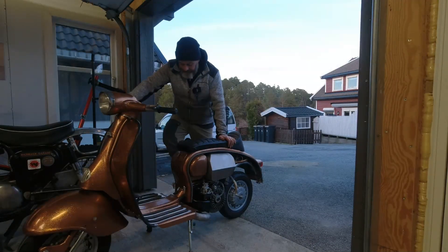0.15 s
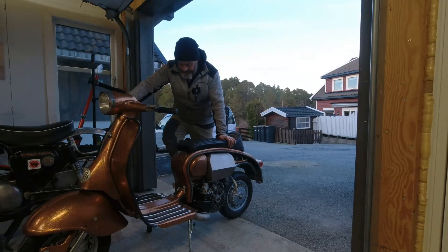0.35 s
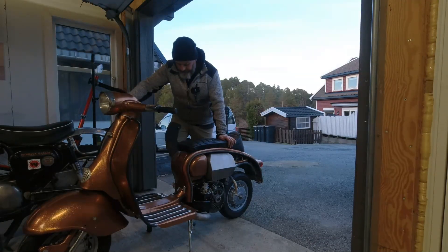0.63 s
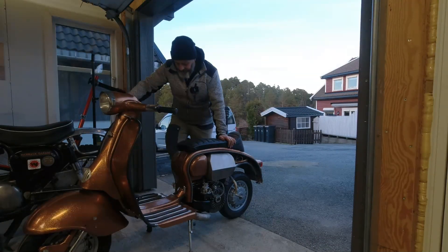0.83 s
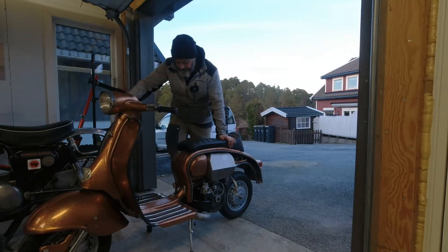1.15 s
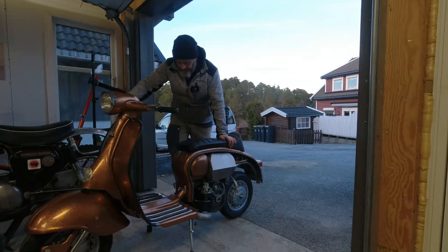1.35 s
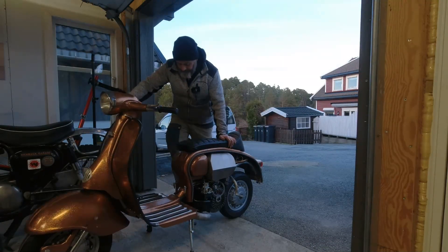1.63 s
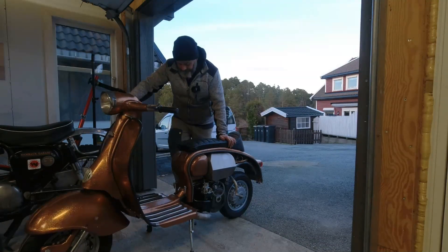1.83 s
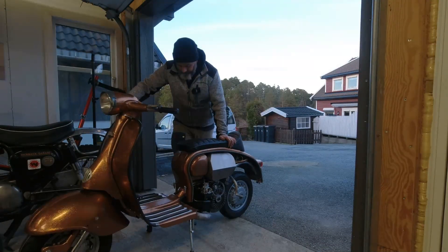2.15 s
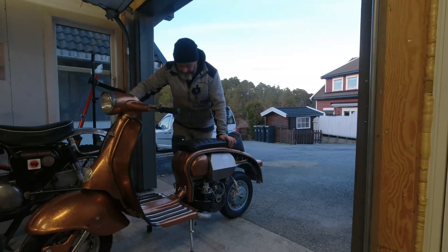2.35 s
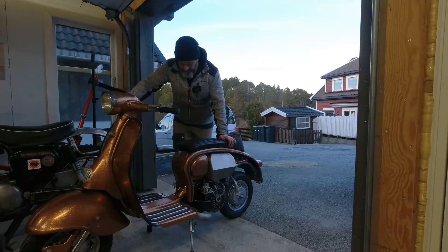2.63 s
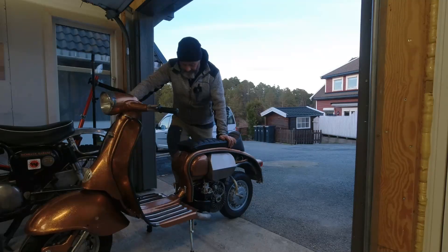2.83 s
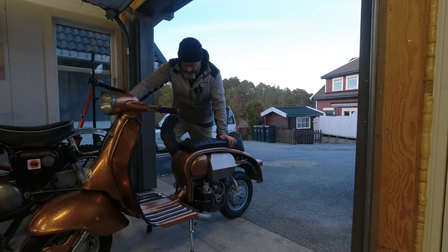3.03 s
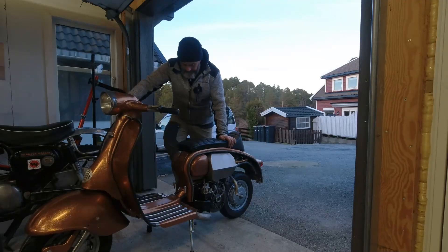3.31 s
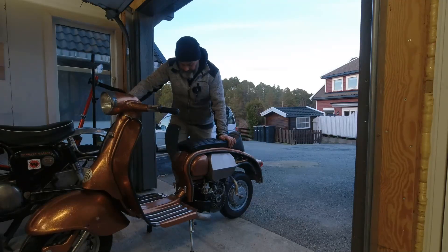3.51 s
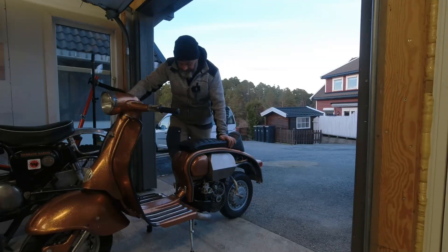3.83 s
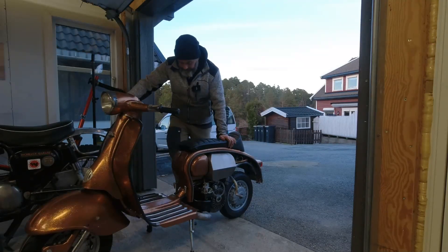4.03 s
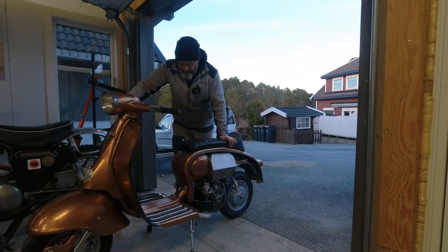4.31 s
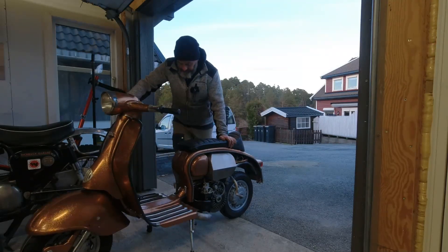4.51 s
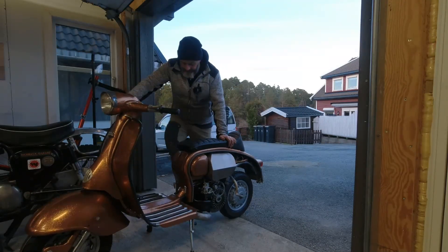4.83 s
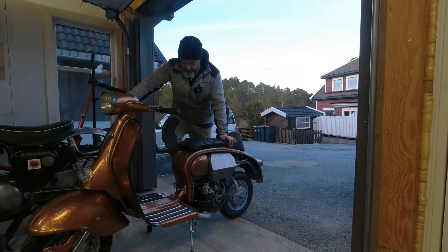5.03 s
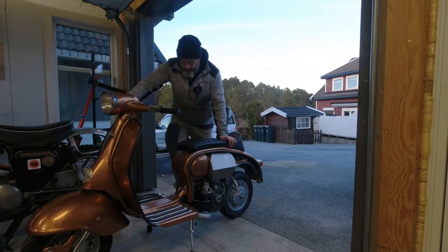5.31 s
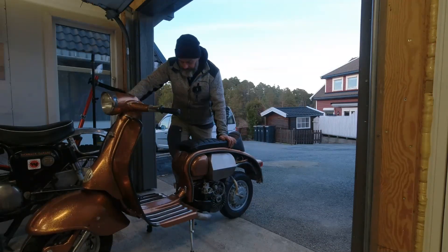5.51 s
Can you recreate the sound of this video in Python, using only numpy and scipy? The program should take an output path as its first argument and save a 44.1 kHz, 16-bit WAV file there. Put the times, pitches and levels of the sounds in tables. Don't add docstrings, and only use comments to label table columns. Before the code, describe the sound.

A scooter on its stand creaks with short, dry high squeaks in a garage doorway. Around two seconds a kick gives a thumping, rattling scrape; a second later the lever clanks back twice, ringing. Boots thud, squeaks return, then a second kick and another double clank. The engine never fires. Close stereo microphone, sparse garage echo, faint outdoor hush.

```python
import sys
import numpy as np
from scipy import signal
from scipy.fft import rfft, irfft
from scipy.io import wavfile
from scipy.ndimage import uniform_filter1d

SR = 44100
rng = np.random.default_rng(int(sys.argv[2]) if len(sys.argv) > 2 else 0)


def to_wav(sig):
    pcm = np.clip(np.atleast_2d(sig), -1, 1) * 32767
    pcm = np.round(pcm).astype(np.int16)
    wavfile.write(sys.argv[1], SR, pcm.T)


def convert_level_to_amplitude(level_db):
    exponent = np.asarray(level_db, float) / 20
    return 10 ** exponent


N = 249606


def evened(x):
    return x / np.sqrt(np.mean(x ** 2) + 1e-20)


def read(points, hz):
    f, value = np.transpose(points)
    return np.interp(np.log(hz + 1), np.log(f + 1), value)


def add(mix, s, sound):
    part = mix[round(s * SR):][:len(sound)]
    part += sound[:len(part)]


def wander(count, size, per_s):
    knots = rng.standard_normal((count, round(size / SR * per_s) + 3))
    at = np.arange(size) / SR * per_s
    return np.array([np.interp(at, np.arange(len(k)), k) for k in knots]) * np.sqrt(1.5)


def resonate(x, hz, width_hz):
    turn = np.exp(2j * np.pi * np.cumsum(hz * np.ones(len(x))) / SR)
    r = np.exp(-np.pi * width_hz / SR)
    return 2 * (turn * signal.lfilter([1 - r], [1, -r], x / turn)).real


def body(x, modes, patchy_db):
    total = np.zeros(N)
    for (hz, width_hz, db), drift in zip(modes, wander(len(modes), N, 14)):
        rung = resonate(resonate(x, hz, width_hz), hz, width_hz)
        total += convert_level_to_amplitude(db + patchy_db * drift) / np.sqrt(width_hz) * rung
    return evened(total)


def slips(per_s, spread_db):
    size = convert_level_to_amplitude(spread_db * np.minimum(rng.exponential(1, N), 4))
    return size * rng.choice([-1., 1.], N) * (rng.random(N) < per_s / SR)


def stroke(s, rise_s, hold_s, db, sag_db_per_s, release_db_per_s):
    rise_db, step = 25.5, 32
    t = np.arange(0, N, step) / SR - s
    after = np.maximum(t, 0)
    shape_db = rise_db * np.minimum(t, 0) / max(rise_s, .001)
    shape_db -= sag_db_per_s * np.minimum(after, hold_s)
    shape_db -= release_db_per_s * np.maximum(after - hold_s, 0)
    return np.repeat(convert_level_to_amplitude(np.maximum(db + shape_db, -140)), step)[:N]


def played(rows, sag_db_per_s, release_db_per_s, main, side):
    powers = np.array([stroke(*row[:4], sag_db_per_s, release_db_per_s) ** 2 for row in rows])
    side_powers = convert_level_to_amplitude([row[4] for row in rows]) ** 2 @ powers
    return main * np.sqrt(powers.sum(0)) + side * np.sqrt(side_powers)


def banded(x, band_hz, rise_s, order=4):
    t = np.arange(len(x)) / SR
    sos = signal.butter(order, band_hz, "bandpass", fs=SR, output="sos")
    x = signal.sosfilt(sos, x * (1 - np.exp(-(t / rise_s) ** 2)))
    return x / np.std(x[:round(0.011 * SR)])


def air():
    # frequency in Hz, level in dB per Hz.
    hush = [(20, -17.5), (113, -2), (298, 0.5), (1270, -13.5), (1800, -20), (5500, -25.5), (11900, -33),
            (15600, -56.5)]
    hz = np.fft.rfftfreq(1024, 1 / SR)
    a, b, patches = rng.standard_normal((N // 256 + 5, 513, 3)).T
    patches = evened(uniform_filter1d(uniform_filter1d(patches, 14, 0), 16, 1))
    z = (a + 1j * b) * convert_level_to_amplitude(read(hush, hz)[:, None] + 3.15 * patches)
    return convert_level_to_amplitude(-66) * evened(signal.istft(z, nperseg=1024, noverlap=768)[1][:N])


def garage(x):
    # frequency in Hz, t60 in seconds.
    dying = [(150, 0.48), (500, 0.45), (1500, 0.61), (4000, 0.34), (10000, 0.34)]
    taps = np.zeros(SR)
    at = np.arange(300, SR - 20, 20)
    taps[at + rng.integers(0, 20, len(at))] = rng.choice([-1., 1.], len(at))
    hz, t, z = signal.stft(taps, SR, nperseg=256)
    tail = signal.istft(z * convert_level_to_amplitude(-60 * t / read(dying, hz)[:, None]), SR, nperseg=256)[1]
    return signal.fftconvolve(x, tail / np.linalg.norm(tail))[:N]


def spread(x):
    # frequency in Hz, left-right likeness [0-1].
    likeness = [(60, 1.0001), (150, .9985), (300, .998), (700, .993), (1300, .982), (2000, .89),
                (4970, 0.93), (9000, .84), (15000, 0.35)]
    # frequency in Hz, gain [ratio].
    left_gain = [(300, 1), (1500, .975), (12000, .955)]
    hz, t, z = signal.stft(x, SR, nperseg=512)
    apart = np.sqrt(np.clip(1.0003 - read(likeness, hz), 0, 1) / 2)[:, None]
    apart = apart * np.exp(2j * np.pi * rng.random(z.shape))
    ports = np.array([z * (read(left_gain, hz)[:, None] + apart), z * (1 - apart)])
    return signal.istft(ports, SR, nperseg=512)[1][:, :N]


def scuffs():
    # full at in seconds, rise in seconds, hold in seconds, level in dB, lower grit in dB relative.
    brushes = [(0.084, 0.044, 0.076, -65, -2), (0.256, 0.08, 0.0067, -72, 2),
               (1.372, 0.055, 0.0088, -57.5, -2.5), (2.1, 0.022, 0.033, -71, 2),
               (2.975, 0.088, 0.023, -50.5, -1.5), (4.89, 0.1, 0.018, -65, -2.5),
               (4.99, 0.016, 0.013, -50, -3.5), (2.1, .02, .006, -64, 8), (3.2, 0.013, .006, -61, 7.5),
               (2.334, .01, .004, -63, -1), (0.542, .03, 0.025, -69.5, 3.5), (.005, .005, 0.037, -73, 4.5)]
    # frequency in Hz, width in Hz, level in dB.
    grit_high = [(7000, 3500, 0), (10500, 3500, -5)]
    grit_low = [(2500, 1800, 0), (3900, 2000, -1)]
    drive = slips(2500, 1.9)
    return played(brushes, 53, 396.5, body(drive, grit_high, 2.5), body(drive, grit_low, 2.5))


def squeals():
    # start in seconds, length in seconds, start in Hz, end in Hz, level in dB.
    whistles = [(.74, .18, 2120, 2140, -64), (.73, .06, 2670, 2640, -61), (.955, .075, 3280, 3284, -67),
                (2.342, .026, 10500, 10600, -70), (2.39, .19, 8300, 8530, -74),
                (2.742, .07, 2190, 2220, -69), (3.817, .072, 2610, 3750, -67),
                (4.033, .056, 2520, 3300, -75), (3.15, .17, 13050, 12900, -69),
                (5.01, .11, 12900, 13000, -66), (1.34, .045, 3600, 3600, -70),
                (2.955, .045, 6200, 6150, -54), (.95, .09, 2100, 2100, -69), (2.95, .04, 2650, 2650, -58),
                (.71, .06, 6950, 6900, -57), (3.6, .07, 2150, 2150, -66), (2.025, .02, 8600, 8600, -48)]
    out = np.zeros(N)
    for s, length_s, start_hz, end_hz, db in whistles:
        hz = np.linspace(start_hz, end_hz, round(length_s * SR))
        tone = resonate(resonate(rng.standard_normal(len(hz)), hz, 110), hz, 110)
        add(out, s, convert_level_to_amplitude(db) * evened(tone) * np.hanning(len(hz)))
    return out


def rub():
    # full at in seconds, rise in seconds, hold in seconds, level in dB,
    # lower squeaks in dB relative.
    rubs = [(.08, 0.015, 0.032, -44.5, -13.5), (.264, 0.03, 0.0035, -68, 1.5),
            (.7, 0.015, 0.12, -42, -15.5), (.986, 0.072, 0.0059, -63, -4), (1.2, 0.016, 0.0077, -72.5, -3),
            (1.968, .015, .01, -62, -10), (2.36, 0.036, 0.16, -46.5, -14.5),
            (2.772, 0.055, 0.015, -60, -4.5), (3.546, 0.018, 0.05, -52, -18),
            (3.598, 0.024, 0.079, -50.5, -9.5), (3.86, 0.17, 0.006, -58, -7.5),
            (4.06, 0.067, 0.01, -68, -4.5), (4.22, 0.039, 0.095, -65.5, -6),
            (4.66, 0.079, 0.012, -62, -2.5), (4.885, 0.046, 0.022, -62.5, 4.5),
            (5.566, 0.006, 0.047, -51, -12.5), (5.615, 0.062, .07, -47, -13)]
    scrapes = [
        (2.012, 0.019, 0.0037, -29, -6.5),
        (2.04, .01, 0.029, -45, 0),
        (2.097, 0.012, 0.041, -32.5, -5.5),
        (2.18, 0.0089, 0.017, -54, -12),
        (2.965, 0.021, 0.054, -45.5, -5),
        (4.337, 0.012, 0.023, -32.5, -11),
        (4.39, .01, 0.017, -46.5, -10),
        (4.428, 0.011, 0.051, -32, -9),
        (4.5, 0.011, 0.081, -49, -5.5),
    ]
    # time in seconds, frequency in Hz.
    joint = [(.1, 6430), (.3, 6430), (.8, 6230), (2.02, 6000), (2.12, 6080), (2.45, 6160), (3.6, 6140),
             (4.4, 6035), (5.6, 6190)]
    # frequency in Hz, width in Hz, level in dB.
    rub_low = [(2110, 310, 2), (2550, 390, -8), (3300, 75, -9), (2750, 1400, 9.5)]
    rub_high = [(8560, 340, 3.5), (9660, 300, 1.5), (10150, 260, 3.5), (11160, 344, 0), (11920, 460, -4),
                (10500, 2500, 1.5)]
    grind_modes = [(4900, 500, -3), (7480, 800, 5), (8140, 700, 0.5), (10280, 1300, 0.5), (8400, 4400, 5),
                   (12500, 2000, -13)]
    hz = np.interp(np.arange(N) / SR, *np.transpose(joint)) + 45 * wander(1, N, 18)[0]
    drive = slips(3000, 2.5)
    core = evened(resonate(resonate(drive, hz, 380), hz, 380))
    skirt = body(drive, [(1.087 * hz, 600, 0), (0.75 * hz, 300, -14)], 2.7)
    free = evened(core + .42 * skirt)
    low, high = body(drive, rub_low, 3), body(drive, rub_high, 3)
    loaded = body(drive, [(hz, 520, 0), (1.037 * hz, 900, -3)], 2.5)
    grind = body(slips(4000, 2.5), grind_modes, 4)
    rubbing = played(rubs, 35, 346, free + convert_level_to_amplitude(-20) * high, low)
    scraping = played(scrapes, 57, 598.5, loaded + convert_level_to_amplitude(-4.5) * grind, low)
    return rubbing + scraping


def frame():
    # full at in seconds, rise in seconds, hold in seconds, thump in dB, panel rattle in dB relative.
    jolts = [(.001, .001, .004, -57.5, 2.5), (.318, .06, .01, -90, -9), (.976, .04, 0.0082, -86, -49.5),
             (1.38, 0.12, .015, -50.5, -33), (1.51, .03, 0.038, -64.5, -8), (1.84, 0.12, 0.009, -62.5, -38),
             (2.005, 0.029, 0.04, -41, 3.5), (2.04, 0.021, 0.018, -34, -5), (2.1, 0.035, 0.055, -32, -6),
             (2.17, 0.022, 0.047, -38.5, -4), (2.28, .02, 0.13, -59, -6), (2.654, 0.038, .01, -77, -17),
             (2.826, 0.13, .01, -57, -12.5), (2.96, 0.1, 0.033, -58, -1.5), (3.2, .05, 0.046, -53, -20),
             (3.5, .02, 0.063, -67.5, 8), (4.352, 0.035, 0.036, -31.5, -2.5), (4.43, 0.031, .04, -32.5, -4),
             (4.47, .01, 0.057, -40.5, -2.5), (4.58, .02, 0.27, -60, -14), (4.834, 0.071, 0.046, -60, -12),
             (5.15, 0.099, 0.086, -55, -16.5), (5.4, .02, .07, -63, 8)]
    # full at in seconds, rise in seconds, hold in seconds, level in dB.
    puff_rows = [
        (2.043, 0.045, .01, -34),
        (2.22, 0.048, .01, -65),
        (4.376, .06, .03, -43),
        (4.486, .04, .01, -60),
        (4.822, .05, 0.0087, -68),
    ]
    # frequency in Hz, width in Hz, level in dB.
    frame_modes = [(112, 39, -8), (155.8, 47, -3), (169.6, 84, 4.5), (211.7, 34, 6), (275.4, 15, -3.5),
                   (202, 170, 3)]
    panel_modes = [(400, 34, 0.5), (460, 50, -1.5), (568, 175, 1), (655, 230, -11.5), (954, 290, 0.5),
                   (1268, 80, -5), (960, 5500, -9.5)]
    silencer_modes = [(63, 38, -12), (102.1, 25, -6)]
    thump = body(slips(400, 3.9), frame_modes, 2.8)
    rattle = body(slips(900, 2.13), panel_modes, 2.7)
    tremble = convert_level_to_amplitude(-75.5) * (thump + convert_level_to_amplitude(-0.5) * rattle)
    puff_gain = convert_level_to_amplitude(-76.5) + sum(stroke(*row, 0, 256.5) for row in puff_rows)
    puffs = puff_gain * body(slips(250, 8.16), silencer_modes, 0.89)
    return played(jolts, 45.5, 374, thump, rattle) + tremble + puffs


def thud(scuff_db, boom_db, panel_db, hz, decay_s):
    t = np.arange(round(.2 * SR)) / SR
    push, slap, scuff = rng.standard_normal((3, len(t))) * convert_level_to_amplitude(2.3 * wander(3, len(t), 160))
    fade = np.exp(-t / max(decay_s, .002))
    buzz = 0.28 * np.exp(-t / 0.035)
    tone = np.sin(2 * np.pi * hz * t) + 0.62 * evened(resonate(push, 0.85 * hz, 0.7 * hz))
    boom = convert_level_to_amplitude(boom_db - 7.0) * banded(tone * fade, (min(170, 0.62 * hz), 850), 0.0076)
    panel = convert_level_to_amplitude(panel_db - 8.5) * banded(slap * (fade + buzz), (650, 2150), 0.0021, order=7)
    grit = convert_level_to_amplitude(scuff_db - 26.5) * banded(scuff * fade, (2200, 6000), 0.0091)
    return boom + panel + grit


def padded_blows():
    # start in seconds, boom in dB, panel in dB, boom in Hz, die-away in seconds.
    soft = [(.7232, -33, -44, 460, 0.017), (.7865, -47, -77, 518, 0.013), (1.285, -49.5, -58, 288.2, 0.087),
            (1.305, -46, -68, 440, 0.0097), (1.3546, -43, -57, 280, 0.014), (1.368, -40, -57, 388, 0.0077),
            (1.385, -47, -64, 287, 0.0069), (2.6421, -51.5, -60, 228, 0.0089),
            (2.9203, -54, -47.5, 626, 0.024), (2.9437, -43.5, -70, 236, 0.013),
            (3.0012, -33, -37.5, 423, 0.0064), (3.0113, -27.5, -35.5, 551.6, 0.026),
            (3.3394, -40, -44.5, 493, 0.018), (3.4121, -33, -42, 519, 0.012),
            (3.419, -29.5, -44, 351, 0.0088), (3.4292, -24, -46, 293, 0.0047),
            (3.444, -36, -54, 422, 0.011), (3.476, -48, -53, 400, 0.012), (4.14, -60, -70.5, 272, 0.032),
            (4.871, -52.5, -57, 562, 0.11), (4.92, -28, -36, 581, 0.012), (5.2832, -40, -47, 507, 0.0072),
            (5.3664, -27.5, -33, 500, 0.0035), (5.3781, -27, -45, 300, 0.0054)]
    stamps = [(2.025, -30, -51, 136, 0.019), (4.358, -30.5, -59, 134, 0.029),
              (1.9821, -46.5, -50, 323, 0.021), (2.0068, -27, -36, 205.5, 0.014),
              (2.0405, -22.5, -43, 170, 0.011), (2.0873, -20, -30, 166, 0.006),
              (2.2092, -29.5, -46, 305, 0.0075), (4.3177, -44.5, -51, 210, 0.032),
              (4.347, -30.5, -37, 190, 0.016), (4.3695, -21.5, -47, 140, 0.011),
              (4.385, -34.5, -53, 490, 0.035), (4.41, -36, -52, 125, .02), (2.115, -32, -46, 400, .015),
              (2.13, -29, -48, 190, .015), (4.455, -30.5, -48.5, 160, 0.018), (4.317, -44, -63.5, 250, .01),
              (2.075, -30, -52.5, 525, 0.017), (4.438, -29, -47.5, 179.5, 0.017),
              (4.4248, -28, -31, 206, 0.0076)]
    out = np.zeros(N)
    for rows, scuff_db in (soft, 5.5), (stamps, 12.5):
        for s, boom_db, panel_db, hz, decay_s in rows:
            add(out, s - .003, thud(panel_db + scuff_db, boom_db, panel_db, hz, decay_s))
    return out


def pings():
    # start in seconds, frequency in Hz, peak in dB, t60 in seconds.
    rung_modes = [(3.095, 4830, -30.5, .19), (3.0944, 5981, -32, .13), (3.0945, 3500, -24.5, 0.061),
                  (3.0944, 455, -25, 0.1), (3.166, 5380, -31, 0.045), (3.166, 6810, -29.5, .06),
                  (3.165, 3300, -32, 0.049), (3.166, 5990, -40, 0.28), (5.005, 4305, -25.5, 0.063),
                  (5.005, 5385, -29.5, 0.14), (5.005, 6500, -28, .06), (5.005, 1287, -25, .045),
                  (5.006, 5975, -36.5, 0.19), (5.0684, 3460, -22, 0.065), (5.0684, 3420, -40, 0.27),
                  (5.069, 5975, -35, 0.16), (5.0684, 6790, -39.5, 0.31), (5.0684, 4310, -31, 0.085),
                  (5.0682, 7400, -33, .06), (5.0686, 467, -23.5, 0.1), (3.412, 3520, -52, .06),
                  (3.412, 5330, -51, 0.049), (4.424, 7420, -28, .04), (5.367, 2050, -48, 0.18),
                  (5.367, 1705, -49, 0.27), (5.367, 1302, -45, 0.22), (4.921, 2560, -45, 0.19),
                  (4.921, 2050, -47, .08), (3.001, 4900, -38, 0.056), (3.001, 7800, -40, .04),
                  (3.001, 1283, -31, 0.13)]
    out, t = np.zeros(N), np.arange(round(.4 * SR)) / SR
    shake = wander(2 * len(rung_modes), len(t), 90).reshape(len(rung_modes), 2, -1)
    for (s, hz, db, t60_s), (p, q) in zip(rung_modes, shake):
        tone = (1 + 0.58 * p) * np.sin(2 * np.pi * hz * t) + 0.49 * q * np.cos(2 * np.pi * hz * t)
        add(out, s, convert_level_to_amplitude(db - 60 * t / t60_s) * tone * (1 - np.exp(-t * hz / 3)))
    return out


def knock(edge_db, body_db, plate_db, contact_s, ring, top_hz):
    # frequency in Hz, level in dB, t60 in seconds.
    struck_modes = [(399, -7, 0.13), (463, -2, 0.12), (508.8, -5, 0.14), (551.3, -5, 0.17), (745, -15, 0.13),
                    (897, -11, 0.44), (1018, -7, 0.23), (1154, -15, 0.17), (1227, -12, 0.2), (1278, -7, .12),
                    (1560, -18, .1), (1980, -12.5, 0.099),
                    (2640, -13, .2), (3450, -2, .11), (4240, -7, .14), (4544, -10, .15), (4815, -9, .14),
             (5220, -13, .12), (5370, -8, .12), (5744, -11, .15), (5995, -7, .13), (6810, -10, .2),
             (7400, -12, .1), (7950, -14, .15), (9150, -20, .18), (9750, -18, .1)]
    # frequency in Hz, level in dB per Hz.
    contact_colour = [(59, -55.5), (100, -2), (447, -4), (1260, -5.5), (1900, -16), (5510, -19.5),
                      (12000, -31.5), (15500, -65)]
    t, parts = np.arange(round(.5 * SR)) / SR, struck_modes
    bins_hz = np.fft.rfftfreq(len(t), 1 / SR)
    chance = rng.standard_normal(len(parts))
    shake = wander(2 * len(parts), len(t), 70).reshape(len(parts), 2, -1)
    modes, peaks = np.zeros(len(t)), np.zeros(len(bins_hz))
    for (hz, db, t60_s), a, (p, q) in zip(parts, chance, shake):
        tone = (.9 + 0.93 * p) * np.sin(2 * np.pi * hz * t) + 0.85 * q * np.cos(2 * np.pi * hz * t)
        modes += convert_level_to_amplitude(db + 1.2 * a - 60 * t / t60_s) * tone
        peaks += convert_level_to_amplitude(1.2 * a + .7 * db + 4) / (1 + ((bins_hz - hz) / (.02 * hz)) ** 2)
    lumps = .5 + (.15 + 2 * ring) * peaks
    colour = convert_level_to_amplitude(read(contact_colour, bins_hz)) * lumps
    noise = irfft(rfft(rng.standard_normal(len(t))) * colour, len(t))
    chatter = 0.16 * np.exp(-t / 0.042) * convert_level_to_amplitude(2.4 * wander(1, len(t), 200)[0])
    noise *= np.exp(-t / max(contact_s, .001)) + chatter
    out = np.zeros(len(t))
    for db, band_hz, rise_s in ((body_db, (190, 730), .005), (plate_db, (680, 2700), .002),
                                (edge_db - 11.5, (2400, top_hz), .0005)):
        burst = (1 - ring) * banded(noise, band_hz, rise_s, order=5)
        out += convert_level_to_amplitude(db) * (burst + .75 * ring * banded(modes, band_hz, rise_s))
    return out


def metal_blows():
    # start in seconds, edge peak in dB, body in dB, plate in dB, contact in seconds.
    clanks = [
        (3.0941, -12.5, -29.5, -27.5, 0.016),
        (3.166, -11.5, -28.5, -26, 0.0027),
        (5.005, -12, -29.5, -26, 0.0058),
        (5.0683, -11.5, -31, -28, 0.0031),
    ]
    # start in seconds, edge peak in dB, body in dB relative, plate in dB relative,
    # contact in seconds.
    ticks = [
        (0.4979, -36.5, -6.5, -11.5, 0.0087),
        (1.779, -56.5, -17, -9, 0.0052),
        (2.0963, -23.5, -4.5, -13.5, 0.003),
        (2.6425, -57.5, -13, -7, 0.004),
        (4.4243, -23, -15.5, -21.5, 0.0036),
        (5.36, -52.5, -4, -2, 0.006),
        (5.604, -40.5, -23, -53, 0.0042),
    ]
    clacks = [(1.287, -66, 10, -4, .005), (1.303, -64, 8, 2, .004), (1.352, -62, 6, 2, .004),
              (1.37, -58, 4, 0, .005), (1.51, -68, 12, 2, .005), (1.98, -60, 12, 10, .006),
              (3.42, -48, 10, 10, .008), (3.001, -25.5, -7.5, -1.5, 0.0056), (3.412, -45.5, -1, 7, .012),
              (3.472, -62, -1, 6, 0.0025), (4.842, -64, 15, 8, 0.003), (4.869, -60, 12, 12, .004),
              (4.921, -46, 10, 12.5, 0.013), (4.927, -43.5, 2.5, 10, 0.0023), (5.279, -41.5, -7, 4, 0.0046),
              (2.918, -55.5, 3, 7, .006), (4.955, -58, 6, 8, .004), (3.335, -49, -3, 3, .008),
              (5.367, -47.5, 12, 12.5, 0.0073), (5.381, -50.5, 19, 1, 0.0058)]
    out = np.zeros(N)
    for s, *blow in clanks:
        add(out, s, knock(*blow, ring=.3, top_hz=11900))
    for rows, top_hz in (ticks, 11700), (clacks, 5900):
        for s, edge_db, body_db, plate_db, contact_s in rows:
            body_db, plate_db = edge_db + body_db - 7.0, edge_db + plate_db - 7.5
            add(out, s, knock(edge_db, body_db, plate_db, contact_s, 0, top_hz))
    return out


def scene():
    clanks, thuds = metal_blows(), padded_blows()
    steady = rub() + scuffs() + squeals() + frame() + pings()
    sway_per_s = 7
    turn = np.pi * sway_per_s * np.arange(N) / SR
    wet = convert_level_to_amplitude(-8) * clanks + convert_level_to_amplitude(-9.5) * thuds + convert_level_to_amplitude(-13) * steady
    echo = garage(wet * np.cos(turn)) + garage(wet * np.sin(turn))
    return spread(clanks + thuds + steady + echo + air())


def roll_off(x):
    return signal.sosfilt(signal.butter(12, 15750, fs=SR, output="sos"), x)


def record(dry):
    treble_cut = signal.cheby1(8, 1, 13700, fs=SR, output="sos")
    bass_cut = signal.butter(1, 70, "highpass", fs=SR, output="sos")
    rolled = signal.sosfilt(treble_cut, dry) + 0.023 * dry
    return roll_off(signal.sosfilt(bass_cut, rolled))


dry = scene()
out = record(dry)
to_wav(out)
```